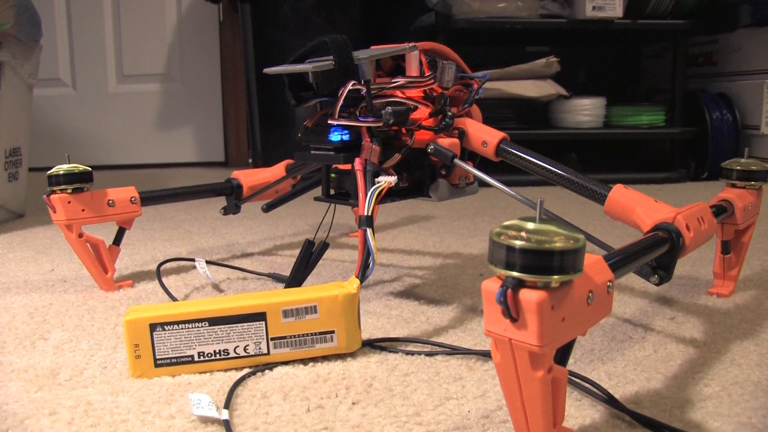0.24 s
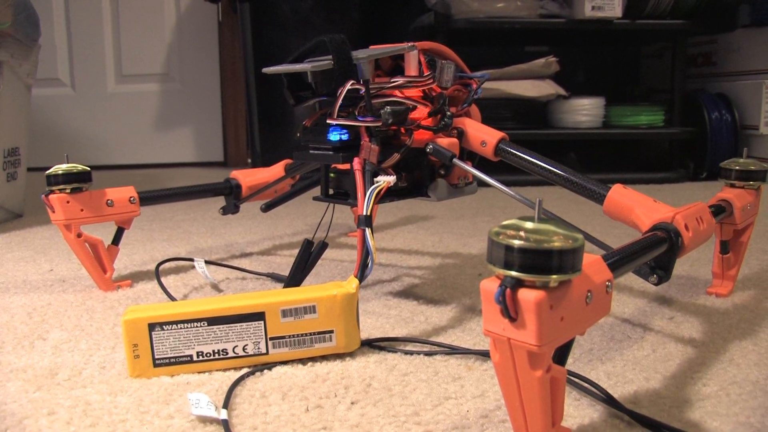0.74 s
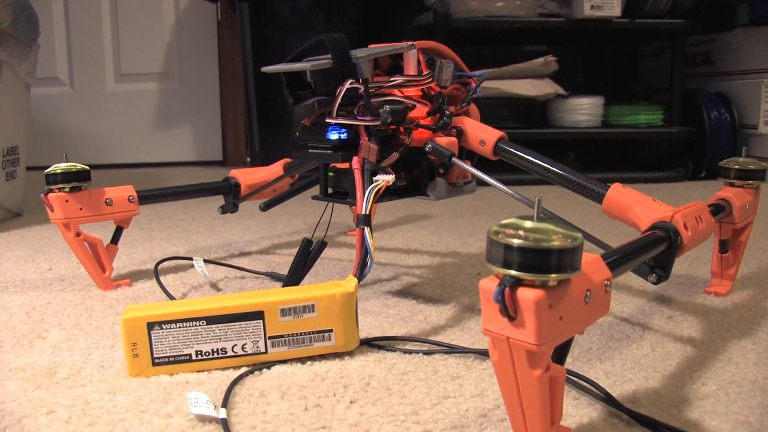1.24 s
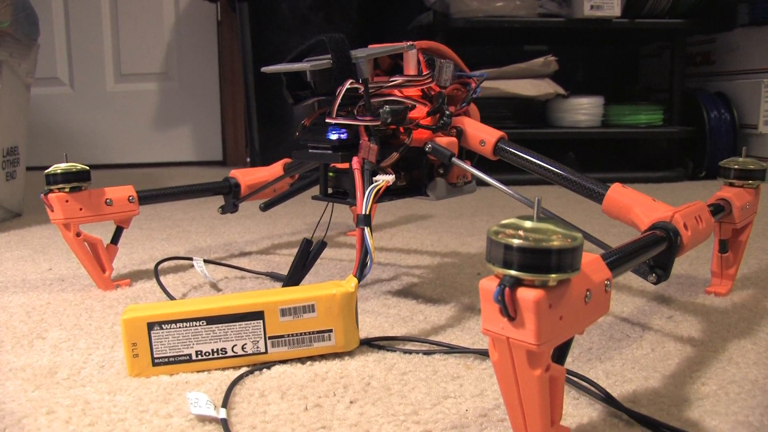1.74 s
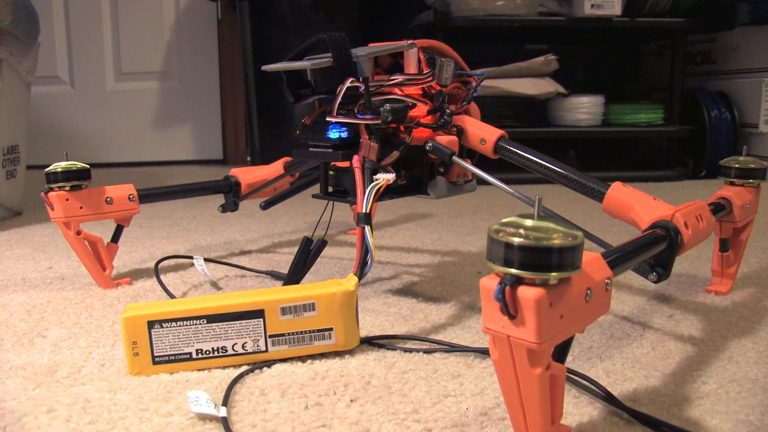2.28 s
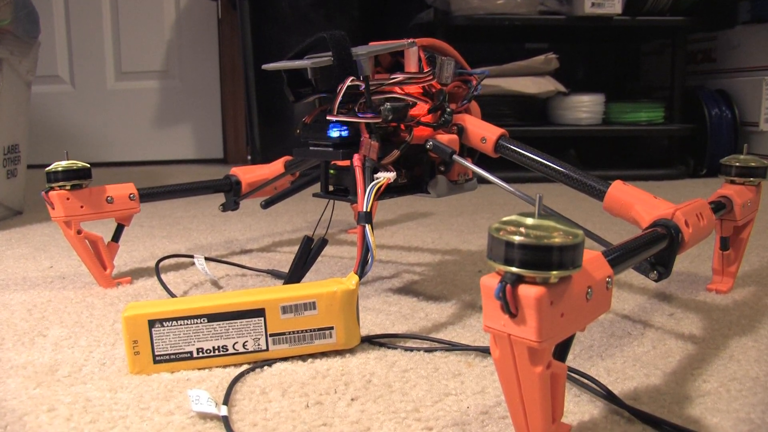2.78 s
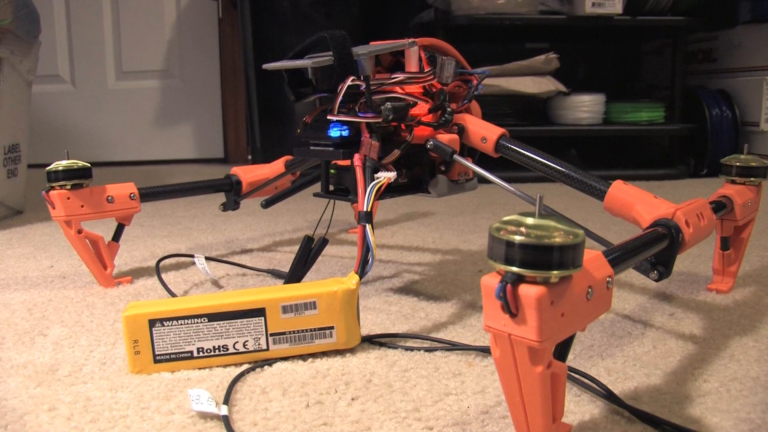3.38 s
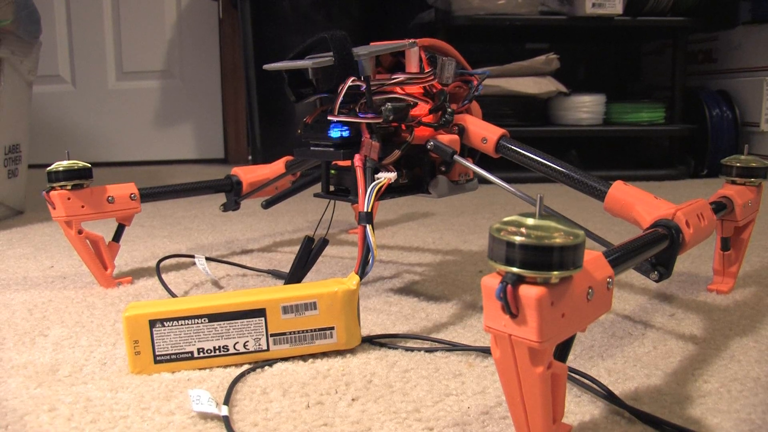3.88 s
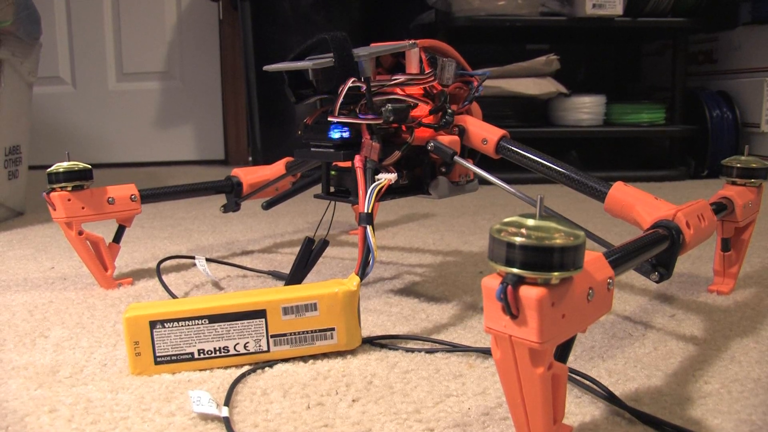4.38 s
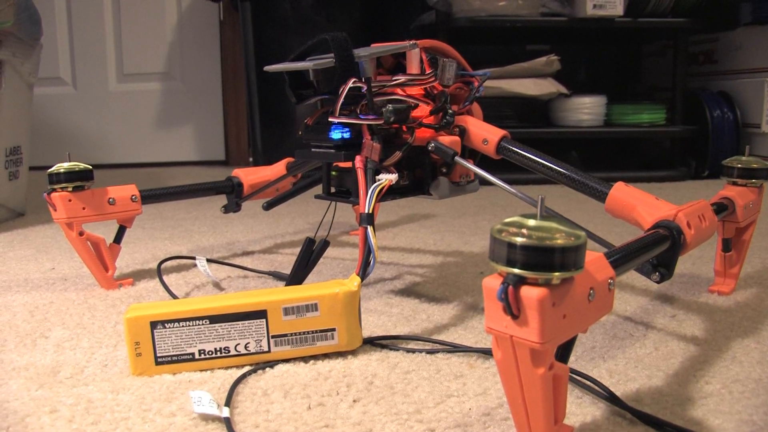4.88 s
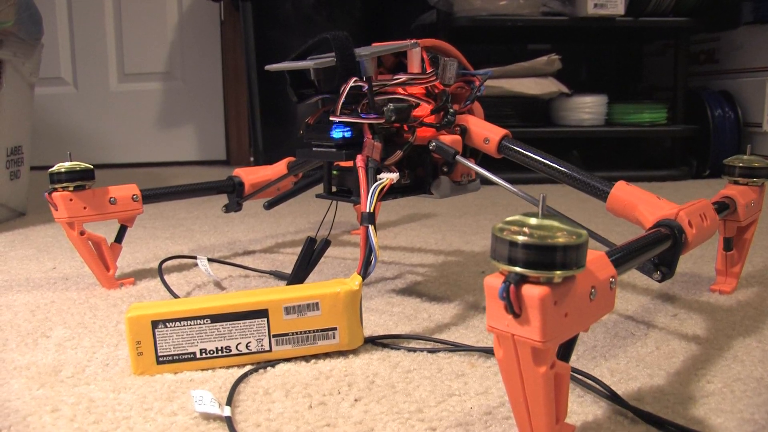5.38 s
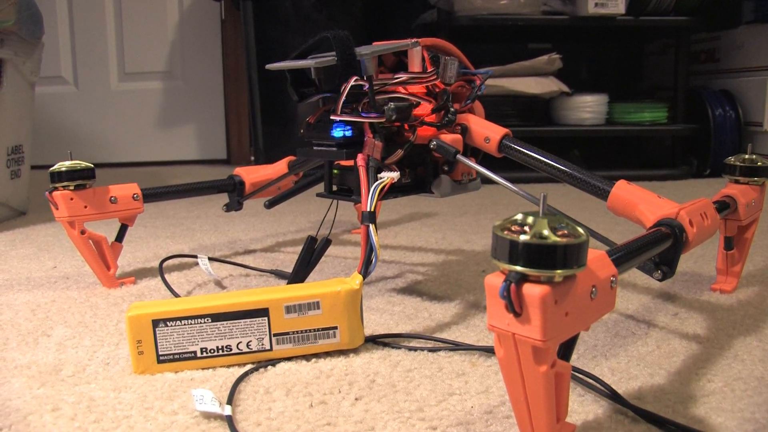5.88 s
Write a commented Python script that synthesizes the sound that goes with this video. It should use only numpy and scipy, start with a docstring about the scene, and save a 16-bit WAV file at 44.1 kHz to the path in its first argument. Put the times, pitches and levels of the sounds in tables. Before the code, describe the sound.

Small propeller-less motors on a light frame whine in beating layers, drop, rev back up with fizzing controllers, and slow to soft dull knocks. After a short pause a high squeal launches a second fast climb, followed by a long falling glide with ringing arms and brief low shudders against carpet. A last squeal starts at the very end. Close microphone, short room reflections, quiet rumble.

```python
"""Four bare brushless motors on a quadcopter on a carpet start near top speed and slow down; a second burst
of throttle follows and they coast to rest. Twice more they start with a squeal: once up to speed and back
to rest, and once just before the end. Each motor sings tones locked to its turning, the bearings rattle,
the arms ring at certain speeds, the speed controllers fizz and the legs shudder at moments on the carpet.
A low room rumble and a faint electrical hum last throughout."""
import sys
import numpy as np
from scipy import signal
from scipy.fft import rfft, irfft, next_fast_len
from scipy.io import wavfile
from scipy.ndimage import uniform_filter1d

SR = 44100
rng = np.random.default_rng(int(sys.argv[2]) if len(sys.argv) > 2 else 0)


def bounce(signal):
    """Save signal as a 16-bit WAV file at the path given by the first command-line argument."""
    frames = np.transpose(np.atleast_2d(signal))
    limited = np.clip(frames, -1, 1)
    pcm = np.round(limited * 32767).astype(np.int16)
    wavfile.write(sys.argv[1], SR, pcm)


N = 270333  # length in samples
T = np.arange(N) / SR  # time in s
TOP_SPEED_HZ = 162.5  # top speed of the slowest motor, turns per second
REFERENCE_HZ = 170  # shaft speed at which the speed laws of the tones give a gain of 1


def undb(db):
    """Decibels to gain."""
    return 10 ** (np.asarray(db) / 20)


def gain_at(points, hz):
    """Gain of a (frequency [Hz], level [dB]) curve at any frequency, read on a log frequency scale."""
    f, db = np.transpose(points)
    return undb(np.interp(np.log(np.maximum(hz, 1)), np.log(f), db))


def unit(x):
    """Scale to rms 1."""
    return x / np.sqrt(np.mean(x ** 2))


def colour(x, points):
    """Shape a sound by a spectrum and scale it to rms 1."""
    n = next_fast_len(N)
    gain = gain_at(points, np.fft.rfftfreq(n, 1 / SR))
    return unit(irfft(rfft(x, n) * gain, n)[..., :N])


def walk(rate):
    """Random wander of spread near 1, heading for a new value rate times a second."""
    knots = rng.standard_normal(8192)
    return np.interp(T * rate, np.arange(len(knots)), knots)


def random_phase():
    """A random starting point in a cycle, in radians."""
    return rng.uniform(0, 2 * np.pi)


def uneven_shake(rough, flutter_hz):
    """Uneven shaking of a resonance: a loudness of rms 1 and a stray phase in radians."""
    shake = unit(np.abs(1 + rough * walk(flutter_hz)))
    stray = rough * walk(flutter_hz)
    return shake, stray


def below_top(hz):
    """Fade a tone out between 16 and 17.5 kHz, so that it never climbs too high."""
    return np.clip((17500 - hz) / 1500, 0, 1)


def place(x, pan_db, lag, wet_db, side_db=-6, t60=0.12):
    """Direct sound reaches the left lag samples later; furniture and walls add a short diffuse tail."""
    t = np.arange(SR // 3) / SR
    # noise that dies by 60 dB in t60 seconds, after a gap of 2 ms
    tail = rng.standard_normal((2, len(t))) * np.exp(-np.log(1000) * t / t60) * (t > .002)
    common, across = tail / np.sqrt(np.sum(tail ** 2, axis=1, keepdims=True))
    # reflections differ between left and right, slightly less in the lows
    lowpass = signal.butter(1, 3500, fs=SR, output="sos")
    across = across - 0.26 * signal.sosfilt(lowpass, across)
    tails = undb(wet_db) * common + undb(side_db) * np.array([across, -across])
    n = next_fast_len(N)
    delay = np.exp(-2j * np.pi * np.fft.rfftfreq(n) * lag)
    late = irfft(rfft(x, n) * delay, n)[:N]
    direct = np.array([late * undb(pan_db / 2), x * undb(-pan_db / 2)])
    return direct + signal.fftconvolve(x[None], tails, axes=1)[:, :N]


# shape of the room rumble: (frequency [Hz], relative level per Hz [dB])
ROOM_RUMBLE = [(25, -4.5), (42, -1), (70, -7), (150, -7), (220, -12.5), (450, -8.5), (800, -21.5),
               (1500, -29), (4000, -44.5), (15000, -52.5)]
# steady hum tones: (frequency [Hz], rms level [dB])
HUM_TONES = [(151.4, -73.5), (5500, -92.5), (5140, -96)]
ROOM_DB = -66.5  # level scale of the rumble


def room():
    """Low rumble of the house as filtered noise, and a faint electrical hum of gently wavering tones."""
    mid = colour(rng.standard_normal(N), ROOM_RUMBLE)
    side = colour(rng.standard_normal(N), ROOM_RUMBLE)
    rumble = np.array([[.7], [1.0]]) * mid + np.array([[1], [-1]]) * side
    hum = np.zeros(N)
    for hz, db in HUM_TONES:
        hum += undb(db) * np.sqrt(2) * np.sin(2 * np.pi * hz * T + 0.28 * walk(5))
    return undb(ROOM_DB) * rumble + hum


# speed of the slowest motor under throttle, one list a run: (time [s], shaft speed [Hz])
THROTTLE_RUNS = [
    [(0, 162.5), (0.08, 161.3), (0.2, 151.0), (0.3, 138.7)],
    [(0.7, 87.8), (0.8, 80.1), (0.9, 77.9), (1.01, 92.7), (1.12, 135.6), (1.2, 159.0), (1.27, 162.4),
     (1.49, 161.9), (1.65, 150.2), (1.8, 135.0)],
    [(3.268, 13.0), (3.35, 45.9), (3.57, 96.3), (3.72, 157.7), (3.78, 162.5), (3.89, 161.7), (4.15, 140.8),
     (4.55, 102.8)],
    [(5.995, 8.0), (6.04, 22.0), (6.13, 47.0)],
]
FRICTION_HZ_PER_S, DRAG_PER_S = 61.5, 0.58


def shaft_speed():
    """The speed follows the throttle; after each run, dry friction and drag slow the rotor towards rest."""
    hz = np.zeros(N)
    offset = FRICTION_HZ_PER_S / DRAG_PER_S
    for run in THROTTLE_RUNS:
        s, run_hz = np.transpose(run)
        coast = (run_hz[-1] + offset) * np.exp(-DRAG_PER_S * (T - s[-1])) - offset
        run_then_coast = np.where(T < s[-1], np.interp(T, s, run_hz), np.maximum(coast, 0))
        hz = np.where(T < s[0], hz, run_then_coast)
    return np.maximum(uniform_filter1d(hz, size=400), 0)  # rotor inertia rounds every change


# each motor against the slowest: (speed ratio [times], lead once well above a crawl [Hz])
MOTOR_SPEEDS = [(1, 0), (1, 4.6), (1.082, 0), (1.145, 3.8)]


def motor_speeds(hz):
    """The four motors never turn quite alike: each has its own ratio and lead over the slowest."""
    return np.array([ratio * hz + lead_hz * np.tanh(hz / 20) for ratio, lead_hz in MOTOR_SPEEDS])


# current pushed into the windings: (on [s], rise time [s], off [s])
CURRENT_PUSHES = [(-.2, .02, .06), (.68, .24, 1.495), (3.264, .014, 3.885), (5.993, .005, 6.3)]
RELEASE_S = 0.089  # time the current takes to die away


def power():
    """1 while current is pushed into the windings, 0 without it, with ramps between."""
    powered = np.zeros(N)
    for on, rise, off in CURRENT_PUSHES:
        powered += np.clip(np.minimum((T - on) / rise, 1 - (T - off) / RELEASE_S), 0, 1)
    return powered


FULL_DUTY_HZ, DUTY_KNEE_HZ = 162.6, 17.3  # speed where chopping stops, and the span leading up to it


def full_duty(hz):
    """Near top speed the controllers stop chopping the current: 0 while they chop, 1 when they stop."""
    return np.clip(1 + (hz - FULL_DUTY_HZ) / DUTY_KNEE_HZ, 0, 1)


STALL_HZ = 7.4  # around and below this speed the noises die away


def by_speed(law, hz, powered):
    """Gain of a noise that grows with speed, by one slope when coasting and another under power."""
    coast_db, coast_slope_db, powered_db, powered_slope_db = law
    octaves = np.log2((hz + 1) / TOP_SPEED_HZ)
    coasting_level = coast_db + coast_slope_db * octaves
    powered_level = powered_db + powered_slope_db * octaves
    db = (1 - powered) * coasting_level + powered * powered_level
    return undb(db) * hz ** 2 / (hz ** 2 + STALL_HZ ** 2)


# shudders: (time [s], relative level [dB], frequency [Hz], length at half height [s])
LEG_SHUDDERS = [(.17, -53, 157, 0.15), (.8, -56, 90.3, 0.39), (2.92, -53, 130, 0.052),
                (4.01, -47, 144, .06), (4.1, -56, 146.6, 0.27), (5.24, -49, 138, 0.035)]


def leg_shudders():
    """The legs shudder on the carpet: low tones that swell and fade, shaken unevenly."""
    out = np.zeros(N)
    shake, stray = uneven_shake(rough=0.4, flutter_hz=43.0)
    for s, db, hz, length in LEG_SHUDDERS:
        near = np.abs(T - s) < 3 * length
        t = T[near] - s
        swell = 2 ** -((2 * t / length) ** 2)
        out[near] += undb(db) * swell * shake[near] * np.sin(2 * np.pi * hz * t + stray[near])
    return undb(-4.5) * out


# speeds at which a tone meets a resonance of the frame:
# (shaft speed [Hz], coasting width [Hz], ringing tone [Hz], coasting level [dB], powered level [dB])
CRITICAL_SPEEDS = [(20, 16, 730, -48.5, -46), (34, 19, 7950, -70, -54.5), (26.4, 17, 3700, -69, -40.5),
                   (36.08, 6.14, 3740, -36.5, -32), (64.64, 2.7, 3750, -32.5, -30.5),
                   (72.4, 2.3, 3800, -35, -29), (98.4, 2.9, 3780, -30.5, -29.5),
                   (123.9, 3.1, 3570, -43, -19.5), (137.8, 3.2, 3880, -30.5, -31.5),
                   (148.3, 1.3, 3835, -27, -26)]
# under power the motors' speeds spread, so each resonance answers over this many times the width
POWERED_SPREAD = 3.4


def arms(hz, powered):
    """The arms ring, shaken unevenly, whenever the shafts pass a critical speed."""
    out = np.zeros(N)
    shake, stray = uneven_shake(rough=1.0, flutter_hz=190)
    spread = 1 + (POWERED_SPREAD - 1) * powered
    for shaft_hz, width, ring_hz, coast_db, powered_db in CRITICAL_SPEEDS:
        distance = 2 * (hz - shaft_hz) / (width * spread)
        nearness = 2 ** -np.minimum(distance ** 2, 40)
        level_db = coast_db + (powered_db - coast_db) * powered
        out += undb(level_db) * nearness * np.sin(2 * np.pi * ring_hz * T + stray)
    return out * shake


# the controllers start the motors from rest: (time [s], length of the squeal before its fade [s])
SQUEAL_STARTS = [(3.268, 0.072), (5.995, 0.087)]
SWITCH_HZ = 9135  # switching tone of the controllers
SQUEAL_DB, SQUEAL_FADE_DB_PER_S = -25.5, 435.5
SQUEAL_ONSET_DB, SQUEAL_ATTACK_S = -12, 0.067  # starts this much softer, and grows for this long


def squeal(turns):
    """The controllers' switching tone at each start; its sidebands fan out as the rotors gather speed."""
    gain = np.zeros(N)
    for s, length in SQUEAL_STARTS:
        attack_db = SQUEAL_ONSET_DB * np.clip(1 - (T - s) / SQUEAL_ATTACK_S, 0, 1)
        fade_db = SQUEAL_FADE_DB_PER_S * np.clip(T - s - length, 0, 1)
        switched_on = np.clip((T - s) / .003, 0, 1)
        gain += switched_on * undb(SQUEAL_DB + attack_db - fade_db)
    ripple = sum(np.cos(12 * turn + walk(60)) for turn in turns)
    return gain * (1 + undb(-20) * ripple) * np.sin(2 * np.pi * SWITCH_HZ * T)


# torque ripple of each motor while pulled up to speed: (cycles per turn [count], relative level [dB])
PULL_TONES = [(21, -45), (28, -43), (42, -45.5), (56, -57.5), (70, -59.5), (84, -56), (105, -56.5),
              (126, -64.5)]
PULL_LAW = 1  # the ripple grows as this power of the speed


def pull(speeds, turns, waver_db=6.0, slip=0.46):
    """Pulses of current tug at the magnets: a fan of harmonics that races up with each motor."""
    out = np.zeros(N)
    for hz, turn in zip(speeds, turns):
        chatter = slip * walk(120)
        for count, db in PULL_TONES:
            gain = undb(db + waver_db * walk(20)) * below_top(count * hz)
            out += gain * np.sin(round(count) * turn + chatter + random_phase())
    return out * (speeds.mean(axis=0) / REFERENCE_HZ) ** PULL_LAW


# shape of the fizz: (frequency [Hz], relative level [dB])
FIZZ_BAND = [(3000, -27.5), (6000, -31.5), (9000, -21.5), (11000, -22.5), (12500, -1.5), (13400, 2.5),
             (14200, 14), (15000, 6.5), (16000, -14)]


def commutation(speeds, turns, hiss_db=-5, patchy_db=-0.5, slip=.8):
    """Chopped winding current: harmonics of the 7 pole pairs sweep through a band of fizz, over a hiss."""
    lines, line_power = np.zeros(N), np.zeros(N)
    for hz, turn in zip(speeds, turns):
        chatter = slip * walk(150)
        for harmonic in (10, 11, 12, 14, 18, 24, 30):
            count = 7 * harmonic  # cycles per turn
            gain = min(1, 100 / count) * gain_at(FIZZ_BAND, count * hz) * below_top(count * hz)
            tone = np.sin(count * turn + chatter + random_phase())
            lines += gain * undb(patchy_db * walk(25)) * tone
            line_power += gain ** 2
    grainy_noise = rng.standard_normal(N) * undb(4.5 * walk(500))
    hiss = colour(grainy_noise, FIZZ_BAND)
    even_lines = lines / np.sqrt(line_power + .15)  # evens out the loudness as tones enter and leave the band
    return even_lines * speeds.mean(axis=0) / REFERENCE_HZ + undb(hiss_db) * hiss


# fizz against speed: (coasting level at top speed [dB], its slope [dB per octave of speed],
# powered level at top speed [dB], its slope [dB per octave of speed]), before the full-duty drop
FIZZ_BY_SPEED = (-29.5, 49, -32.5, 1.5)
FULL_DUTY_DB = -19.5  # the fizz drops by this much when the chopping stops


def fizz(hz, speeds, turns, powered):
    """The controllers fizz while they chop the current, and much less near top speed."""
    chopping_gain = undb(FULL_DUTY_DB * full_duty(hz))
    return by_speed(FIZZ_BY_SPEED, hz, powered) * chopping_gain * commutation(speeds, turns)


def bearings(turns, points, lump, grain_db):
    """Dense tiny knocks of the balls, as grainy noise bunched once per turn of each shaft."""
    load = sum(np.exp(lump * np.cos(turn + random_phase())) for turn in turns)
    return colour(rng.standard_normal(N) * load * undb(grain_db * walk(900)), points)


# shape of the crackle: (frequency [Hz], relative level per Hz [dB])
CRACKLE_SHAPE = [(2500, -4.5), (4200, 10), (5200, 1), (6500, 2.5), (7700, 0), (7950, 6), (8250, 8.5),
                 (9400, -12.5), (10500, -30.5), (12500, -29.5), (15500, -27.5)]
# crackle against speed: (coasting level at top speed [dB], its slope [dB per octave of speed],
# powered level at top speed [dB], its slope [dB per octave of speed])
CRACKLE_BY_SPEED = (-38.5, 23.5, -41, 1)


def crackle(hz, turns, powered):
    """The bright crackle of the bearings, which falls off fast as the coasting rotors slow down."""
    knocks = bearings(turns, CRACKLE_SHAPE, lump=0.33, grain_db=2.5)
    return by_speed(CRACKLE_BY_SPEED, hz, powered) * knocks


# rattle at speed: (frequency [Hz], relative level per Hz [dB])
BRISK_RATTLE = [(150, -45), (330, -21.5), (600, -12.5), (900, -3.5), (1150, -6), (1650, 7.5), (2100, 4),
                (2700, 6.5), (3200, -4), (3800, 7), (4400, -23), (5200, -59), (9000, -61)]
# rattle of a rotor that barely turns: (frequency [Hz], relative level per Hz [dB])
SLOW_RATTLE_SHAPE = [(150, -17), (400, -41.5), (720, -5), (1100, 2.5), (1900, 17.5), (2600, 7.5),
                     (3200, -10.5), (3800, -39.5), (5000, -59.5)]
# rattle against speed: (coasting level at top speed [dB], its slope [dB per octave of speed],
# powered level at top speed [dB], its slope [dB per octave of speed])
RATTLE_BY_SPEED = (-37.5, 4.5, -37, 2.5)
CRAWL_HZ, CRAWL_CUTOFF_HZ = 24, 1700  # below this shaft speed, unpowered knocks lose what lies above the cut-off


def rattling(hz, turns, powered, soft_hz=24, brisk_span_hz=43, power_share=0.99):
    """The bearings rattle brightly at speed; slow, unpowered rotors knock softly and ever duller."""
    brisk = np.clip((hz - soft_hz) / brisk_span_hz + power_share * powered, 0, 1)
    rattle = brisk * bearings(turns, BRISK_RATTLE, lump=0.9, grain_db=3.0)
    rattle += np.sqrt(1 - brisk ** 2) * bearings(turns, SLOW_RATTLE_SHAPE, lump=0.9, grain_db=-0.5)
    lowpass = signal.butter(2, CRAWL_CUTOFF_HZ, fs=SR, output="sos")
    dull = signal.sosfiltfilt(lowpass, rattle)
    sharp = np.clip((hz / CRAWL_HZ) ** 2 + powered, 0, 1)
    return (dull + sharp * (rattle - dull)) * by_speed(RATTLE_BY_SPEED, hz, powered)


# tones of each of the four motors:
# (cycles per turn, rounded when played [count], relative coasting level [dB], rise under full drive [dB])
TONES_0 = [(1, -32.5, 5.5), (3, -42.5, -1.5), (12, -54, -0.5), (14, -53, 4.5), (21, -54, 24.5),
           (22, -54, 30.5), (23, -50.5, -3.5), (26, -40.5, 1), (28, -40.5, -7.5), (36, -34.5, -15),
           (42, -38, 2.5), (56, -43, -10.5), (62.44, -41.5, 4.5), (71, -48.5, 20.5), (77, -53.5, 15.5),
           (86, -57, -2)]
TONES_1 = [(2, -44.5, 4), (3, -36, 0.5), (5, -52, 3), (7, -69.5, 19), (9, -63.5, 17), (10, -66, -1.5),
           (12, -45.5, -10), (36, -28, 6), (48, -50, -3), (83, -58.5, -4)]
TONES_2 = [(3, -49, 1.5), (11, -48, -2.5), (12, -36, 5), (13, -40, -6), (14, -43.5, -13), (24, -51.5, 13),
           (36, -43, -5.5), (82.6, -63.5, 9)]
TONES_3 = [(11, -44.5, -17.5), (12, -39.5, -3.5), (13, -45, -2), (18, -60.5, 12.5), (24, -37.5, -11.5),
           (36, -32, 4), (42, -41, -9), (48, -49.5, -2.5), (54, -49.5, 13), (60, -58, 9), (84.8, -41, -5.5),
           (94.5, -51, -12.5)]
# how the frame radiates each tone: (frequency [Hz], gain [dB])
FRAME_RESPONSE = [(100, -41.5), (330, -17.5), (500, -12.5), (700, -5), (1000, -3.5), (1500, 1), (2000, 4),
                  (2600, -3.5), (3200, -7), (3850, -3.5), (4500, -13), (6000, -19.5), (9000, 1.5),
                  (11000, -26.5), (14500, 3.5)]
SLIP, FLUTTER = .09, .25  # depth of the shaking of a loose rotor: phase of a 12-cycle tone [rad], loudness


def whine(hz, turn, tones, drive, speed_law=1.535, waver_db=4.0):
    """Magnets passing the stator teeth give tones locked to the shaft; they are steadiest under drive."""
    out = np.zeros(N)
    loose = 1 - .8 * drive
    chatter = SLIP * loose * walk(90)  # play in the bearings shakes the rotor
    for count, db, drive_db in tones:
        count = round(count)
        level_db = db + drive_db * drive + waver_db * loose * walk(22)
        gain = undb(level_db) * gain_at(FRAME_RESPONSE, count * hz)
        flutter = 1 + FLUTTER * loose * walk(260)
        phase = count * turn + chatter * np.sqrt(count / 12) + random_phase()
        out += gain * flutter * np.sin(phase)
    return out * (hz / REFERENCE_HZ) ** speed_law


DRIVE_LAW = 0.76  # the drive grows as this power of the speed


def scene():
    """Four motors, their bearings, frame and controllers in the room."""
    hz, powered = shaft_speed(), power()
    speeds = motor_speeds(hz)
    turns = 2 * np.pi * np.cumsum(speeds, axis=1) / SR  # shaft angles in radians
    drive = powered * np.minimum(hz / TOP_SPEED_HZ, 1) ** DRIVE_LAW
    treble = crackle(hz, turns, powered) + fizz(hz, speeds, turns, powered)
    tugging = pull(speeds, turns) * powered * (1 - full_duty(hz))
    motor_tones = (TONES_0, TONES_1, TONES_2, TONES_3)
    whines = [whine(speed, turn, tones, drive) for speed, turn, tones in zip(speeds, turns, motor_tones)]

    out = room()
    out += place(leg_shudders(), pan_db=-7.0, lag=.8, wet_db=-8, side_db=3)
    out += place(arms(hz, powered), pan_db=-3.0, lag=.8, wet_db=-0.5, side_db=-7)
    out += place(squeal(turns), pan_db=3.5, lag=0.3, wet_db=-1, side_db=-2)
    out += place(tugging, pan_db=-1.0, lag=0.23, wet_db=-11.5, side_db=-11.5)
    out += place(treble, pan_db=-1.5, lag=1.0, wet_db=-6.0, side_db=1.5)
    out += place(rattling(hz, turns, powered), pan_db=-4.0, lag=0.57, wet_db=-7.0, side_db=-9.5)
    out += place(whines[0] + whines[1], pan_db=-1.5, lag=.9, wet_db=-14.5, side_db=-8.0)
    out += place(whines[2] + whines[3], pan_db=-1.5, lag=1.0, wet_db=-9.5, side_db=-9.5)
    return out


TOP_HZ = 15900  # upper edge of the treble


def record(dry):
    """A steep low-pass filter cuts the top of the treble."""
    return signal.sosfilt(signal.ellip(10, .2, 80, TOP_HZ, fs=SR, output="sos"), dry)


dry = scene()
out = record(dry)
bounce(out)
```